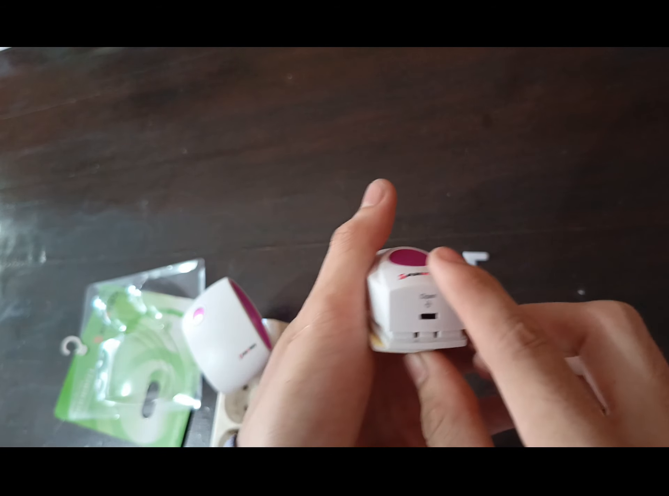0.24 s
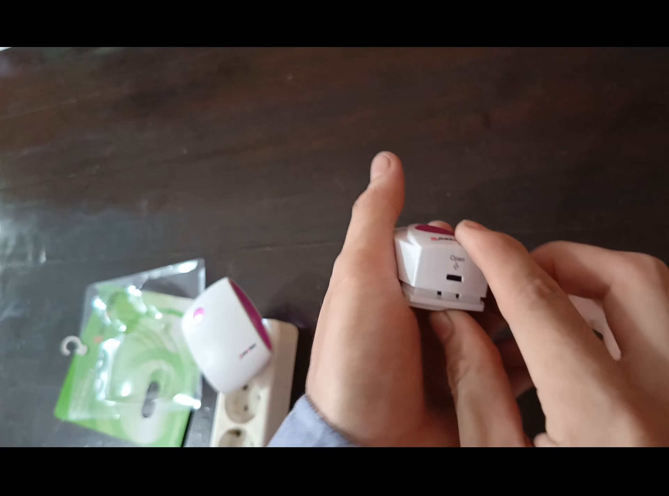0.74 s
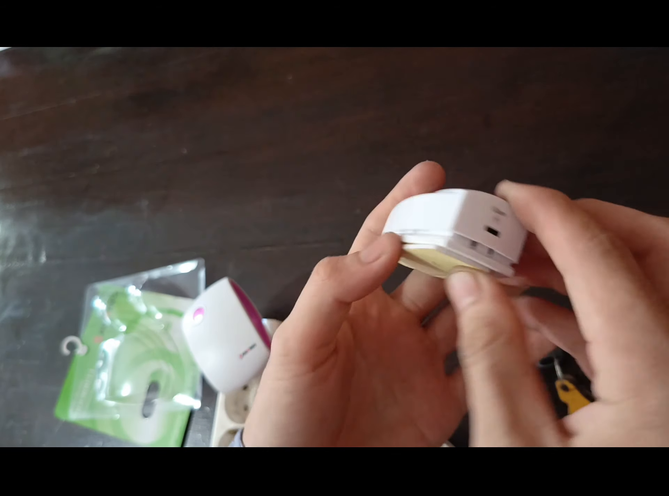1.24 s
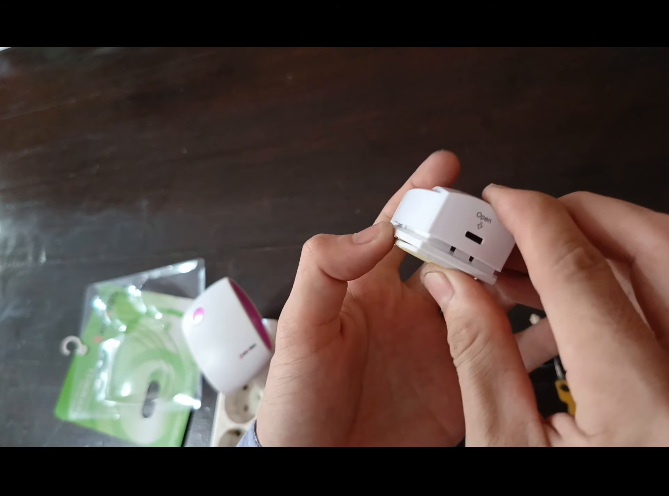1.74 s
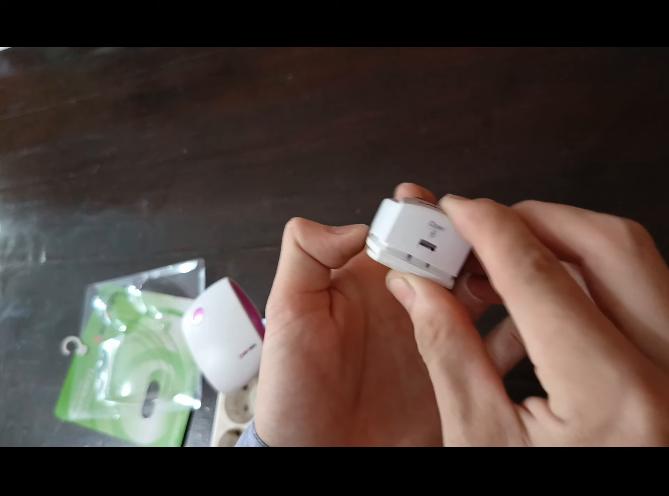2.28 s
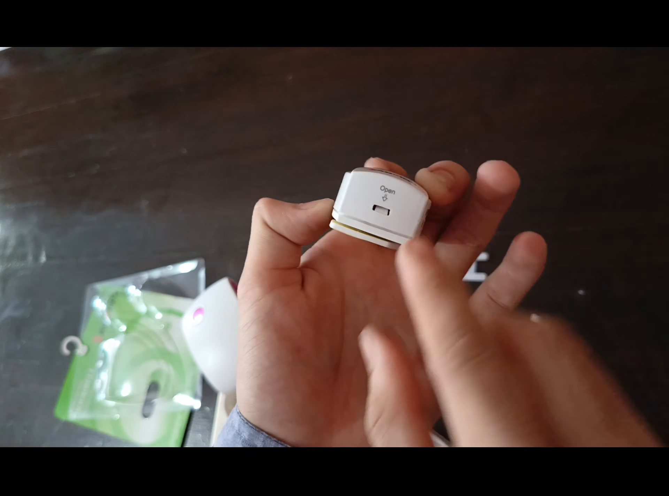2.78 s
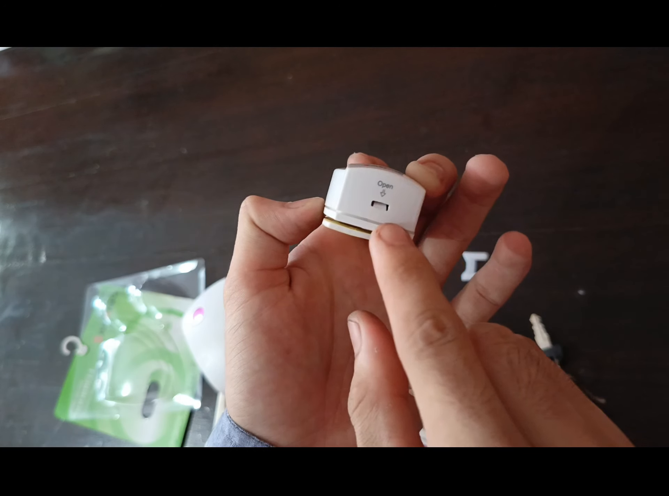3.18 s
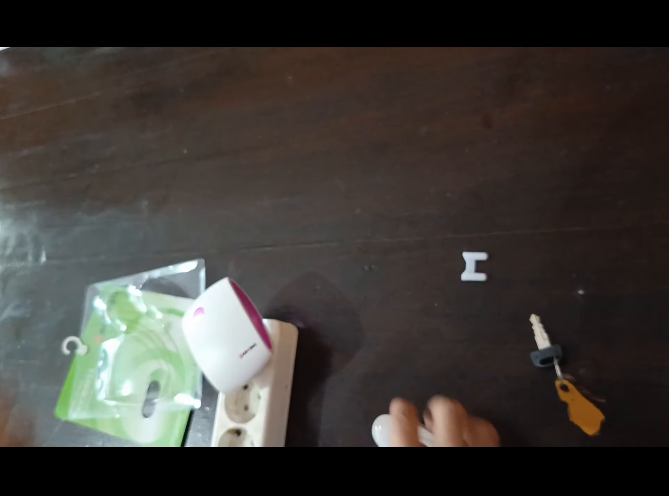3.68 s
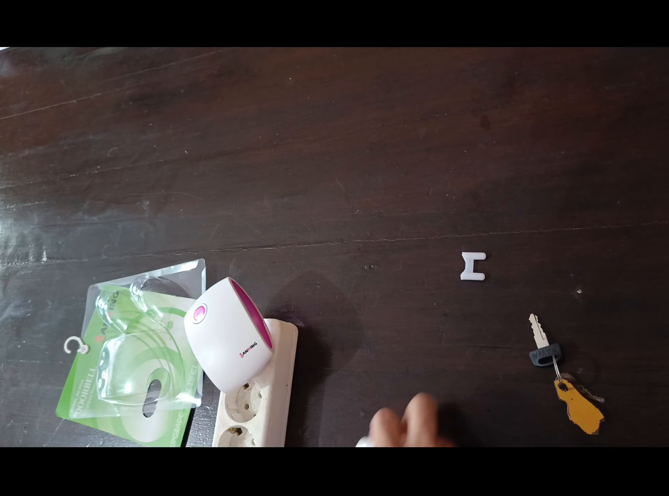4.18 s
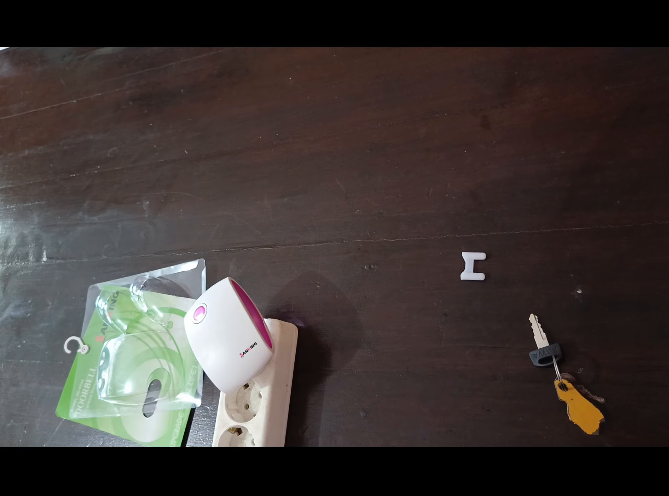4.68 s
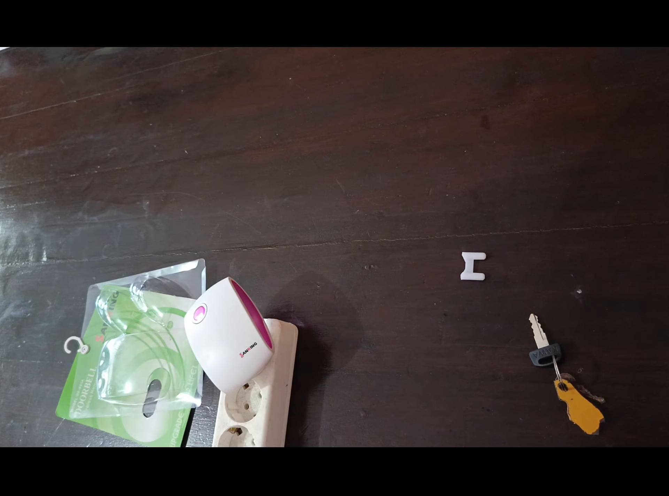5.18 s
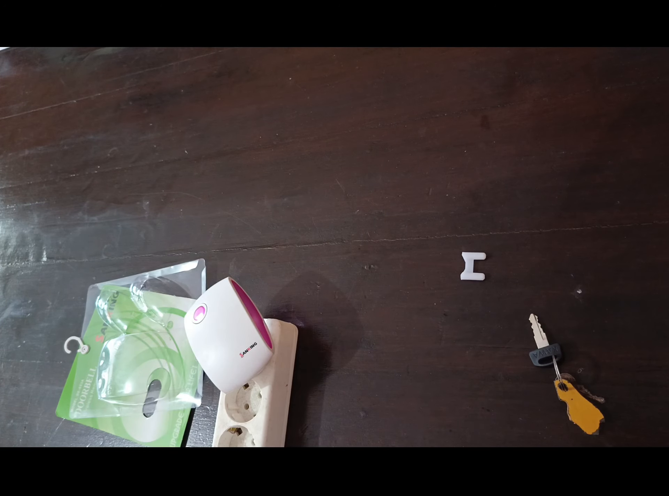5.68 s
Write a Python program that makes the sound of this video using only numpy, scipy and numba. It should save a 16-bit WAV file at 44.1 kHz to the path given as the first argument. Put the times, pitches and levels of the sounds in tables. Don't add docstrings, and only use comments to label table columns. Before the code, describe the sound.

A phone close to the hands in a bare, lightly echoing room. A faint low motor hum winds down and stops by about 0.8 s, over soft street rumble and far bird whistles. From 0.4 s, fingers knock a small hollow plastic shell: dull, boxy clacks around 1 kHz with thin wall ring, a firm one at 0.8 s. A tiny stick-slip creak at 1.35 s leads into a hard knock at 1.4 s; another at 1.7 s bounces quickly. Small ticks gather from 2.3 s, then at 2.43 s a latch snaps shut, bright, sharp and by far loudest, with a short room tail. Quiet skin rubs and touches follow to 3.5 s. Light wooden taps come around 4 s, with dry sleeve rustle, then a brief scrape and taps at 5.1-5.2 s. Bird notes cluster after 5.2 s as a distant vehicle approaches.

```python
import sys
import numpy as np
from scipy import signal
from scipy.fft import rfft, irfft, next_fast_len
from scipy.io import wavfile
from scipy.ndimage import uniform_filter1d, minimum_filter1d
from numba import njit

SR = 44100
rng = np.random.default_rng(int(sys.argv[2]) if len(sys.argv) > 2 else 0)


def waveform_to_disk(signal):
    frames = np.transpose(np.atleast_2d(signal))
    scaled = np.clip(frames, -1, 1) * 32767
    samples = np.round(scaled).astype(np.int16)
    wavfile.write(sys.argv[1], SR, samples)


def gain_from_decibels(decibels):
    exponent = np.asarray(decibels, float) / 20
    return 10 ** exponent


N = 261513
T = np.arange(N) / SR

# (frequency [Hz], density [dB per Hz])
STREET_SPECTRUM = [(25, -28), (50, -12.5), (75, -4.5), (130, -2), (200, -2), (400, -6.5), (1000, -11),
                   (2000, -15.5), (4000, -20.5), (5000, -23.5), (6300, -32), (8000, -46)]
# (rumble [dB], traffic [dB], hiss [dB], deep [dB])
CALM_DB = [-66.5, -71.5, -72, -80]
# (closest [s], half-power time [s], rumble [dB], traffic [dB], hiss [dB], deep [dB])
LEAVING = (0.08, 0.63, -69, -63.5, -69, -70)
LORRY = (4.95, .55, -74, -72, -80, -69)
COMING = (6.5, .35, -75, -58.5, -68.5, -80)
# (start [s], length [s], pitch [Hz], glide [share of pitch], level [dB])
BIRDS = [(0.052, 0.24, 2484, .01, -66), (0.108, 0.42, 2120, -.015, -63.5), (0.261, 0.056, 4120, .05, -72.5),
         (1.6, 0.063, 4050, .1, -75), (1.732, 0.045, 6280, 0.0054, -85), (2.181, 0.07, 3970, -.01, -72),
         (2.269, 0.064, 1880, -.06, -64), (3.05, 0.033, 752, 0.011, -63), (3.079, 0.045, 4580, -.01, -79),
         (3.765, 0.077, 4090, .03, -75.5), (4.157, 0.078, 3250, .03, -68.5),
         (4.465, 0.057, 3390, 0.14, -66.5), (4.911, 0.056, 1890, -0.045, -62.5),
         (5.22, .12, 2856, -.015, -68), (5.299, 0.15, 3870, .12, -75), (5.352, 0.037, 1828, .02, -61),
         (5.416, 0.04, 2000, 0.071, -58), (5.519, .04, 1865, -0.014, -71), (5.552, 0.027, 2280, .03, -73),
         (5.59, 0.058, 1790, -0.095, -58.5), (5.619, .04, 3050, 0.17, -63),
         (5.717, 0.048, 2190, 0.049, -56.5)]
# (start [s], length [s], low edge [Hz], high edge [Hz], level [dB])
RUBS = [(0.271, .05, 7000, 15800, -75), (.85, .09, 3600, 5000, -65), (0.926, 0.042, 1200, 5850, -65),
        (1.39, 0.022, 1500, 5000, -65), (2.192, 0.044, 150, 457, -61.5), (2.762, 0.014, 11050, 15800, -71),
        (2.826, .11, 1803, 5990, -67.5), (2.929, 0.043, 1500, 1877, -67), (2.861, .21, 559.6, 700, -62.5),
        (3.344, 0.078, 3700, 5500, -71.5), (3.495, 0.014, 500, 7000, -65.5),
        (3.551, 0.053, 2200, 5000, -64.5), (3.591, 0.031, 150, 1000, -61.5),
        (3.75, 0.11, 2500, 8000, -75.5), (4.168, 0.07, 200, 1200, -63.5), (4.313, 0.062, 199.4, 1000, -63),
        (4.5, 0.17, 3800, 5200, -72), (5.33, 0.12, 4200, 5000, -79)]
# (frequency [Hz], level [dB])
SKIN = [(150, 0), (4500, -3), (6000, -10.5), (8000, -24), (11500, -16), (13500, -21.5), (15200, -13)]
# (time [s], peak [dB], cavity [Hz], wall ring relative level [dB], wall ring [Hz])
KNOCKS = [(0.445, -40.5, 1180, -13.5, 3460), (0.612, -44, 1100, -21, 3400), (0.642, -62, 976, -22, 3360),
          (0.73, -45, 1060, -29, 2870), (0.828, -17.5, 990, -25, 4300), (0.918, -35.5, 930, -23, 3560),
          (0.991, -44, 960, -13.5, 4240), (1.065, -54, 970, -9.5, 3290), (1.104, -50, 1000, -3.5, 4246),
          (1.4075, -9.5, 1200, -17.5, 4500), (1.533, -49, 1200, -33, 2830), (1.591, -33.5, 1154, -31, 3160),
          (1.683, -13.5, 1053, -21, 3400), (1.813, -45.5, 1016, -18, 3410), (1.878, -50.5, 940, -31, 2880),
          (1.988, -50, 985, -12.5, 3420), (2.273, -48, 980, -17, 2835), (2.318, -49, 960, -18, 3484),
          (2.327, -49.5, 895, -28.5, 3452), (2.349, -49, 940, -21, 3193), (2.367, -48.5, 984, -23, 2985),
          (2.4086, -34.5, 984, -23, 2795), (2.774, -50, 955, -4, 4250)]
# (time [s], peak [dB], cavity [Hz])
TOUCHES = [
    (0.8378, -36.5, 1080),
    (1.4048, -30, 1000),
    (1.6808, -38, 1010),
    (1.6881, -20, 1097),
    (1.692, -33, 1100),
]
# (start [s], end [s], slip rate [1/s], cavity [Hz], level [dB])
CREAKS = [
    (1.335, 1.401, 165, 988, -46.5),
]
# (frequency [Hz], level [dB], t60 [s])
LATCH_MODES = [(900, -23.5, .01), (1310, -16, .01), (1600, -10.5, 0.018), (2300, -9, 0.0069),
               (2710, -6, .013), (3500, -12, .007), (4060, -0.5, 0.0074), (4500, -3.5, 0.0057),
               (4900, -5.5, 0.0085), (6900, -24, 0.006), (7500, -32, 0.0045), (11490, -32, 0.0047),
               (15200, -36, 0.00551)]
# (frequency [Hz], level [dB])
SNAP_TO_WALLS = [(88, -48.5), (150, -19), (466, -13.5), (637, -19), (854, -5.5), (941, -14), (1420, -3),
                 (2060, -8), (4760, -6), (7040, -19), (8070, -36.5), (11700, -30), (16000, -36.5)]
# (time [s], peak [dB], tick [Hz], tick relative level [dB])
TAPS = [(2.731, -59, 2200, 8.5), (3.49, -51, 1480, 0.6), (3.954, -45.5, 1370, 4.5), (3.966, -53, 1320, 6),
        (3.974, -59, 3044, 8), (4.044, -39, 2170, -8.5), (4.057, -47, 1596, -4), (4.194, -55, 3330, -5),
        (4.325, -53.5, 1318, -12), (4.408, -52.5, 2200, -5), (5.134, -44.5, 1470, -14.5),
        (5.141, -45.5, 1610, -5), (5.166, -47.5, 2616, -6), (5.184, -51.5, 1553, 4)]
# (frequency [Hz], level [dB])
SLIDE_COLOUR = [(180, -48), (300, -23), (645, 5.5), (842, -16), (1170, -5), (3130, -11.5), (4750, -19),
                (7820, -38), (16000, -50)]
# (peak time [s], peak [dB], length [s])
SLEEVE = [(2.859, -76.5, 0.074), (3.5, -90, .03), (3.568, -86, .06), (3.71, -86, 0.043),
          (3.791, -80.5, 0.11), (3.975, -80, 0.048), (4.414, -77, 0.029), (4.62, -80, .05),
          (4.77, -88, 0.082), (4.998, -90.5, .08), (5.17, -85, .07)]
# (frequency [Hz], t60 [s], level [dB])
ROOM = [(150, 0.7, -12), (500, 0.4, -7.5), (1200, 0.35, -12.5), (2500, 0.44, -7), (4500, .5, -16),
        (7000, 0.34, -11), (12020, .3, -6)]
# (frequency [Hz], level [dB])
MIC_HISS = [(8200, -13.5), (9000, -0.5), (10600, 3.5), (11300, -9), (12000, -20), (13800, -21.5),
            (15200, -7.5), (15800, -11.5), (16200, -30)]

HUM_HZ, HUM_DB, HUM_SAG_DB_PER_S = 136.3, -56, -7.5
HUM_STOP_S, HUM_STOP_EASE_S, DRONE_DB = 0.82, .04, -69.5
SNAP_S, SNAP_DB, SNAP_TO_WALLS_DB = 2.4289, 7.5, 20.5
SLIDE_S, SLIDE_DB, SLIDE_SAG_DB = 5.128, -49.5, -5.5
SLIDE_ATTACK_S, SLIDE_HOLD_S, SLIDE_RELEASE_S = 0.0067, 0.061, 0.044
REACH_S, REACH_END_S, REACH_EASE_S = 3.5, 5.05, .08
REACH_DB, STILL_DB, REACH_HISS_DB = -93, -103, -76


def noise(n=N):
    return rng.standard_normal(n)


def colour(x, points, lo_hz=1., hi_hz=21940.0):
    n = next_fast_len(len(x))
    f = np.maximum(np.fft.rfftfreq(n, 1 / SR), 1)
    hz, db = np.transpose(points)
    edge_power = 1 / (1 + (lo_hz / f) ** 6) / (1 + (f / hi_hz) ** 6)
    gain = gain_from_decibels(np.interp(np.log(f), np.log(hz), db)) * np.sqrt(edge_power)
    y = irfft(rfft(x, n) * gain, n)[:len(x)]
    return y / y.std()


def walk(rate):
    hold = int(SR / rate)
    steps = np.repeat(noise(N // hold + 1), hold)
    w = uniform_filter1d(uniform_filter1d(steps, hold), hold)[:N]
    return w / w.std()


def swell(start_s, attack_s, hold_s, release_s):
    return np.interp(T, start_s + np.cumsum([0, attack_s, hold_s, release_s]), [0, 1, 1, 0])


def decay(t, t60):
    return np.exp(-np.log(1000) * t / t60)


def ring(hz, t60, rise_s):
    t = np.arange(int(.12 * SR)) / SR
    y = (1 - np.exp(-t / rise_s)) ** 2 * decay(t, t60) * np.sin(2 * np.pi * hz * t)
    return y / np.abs(y).max()


def crack(t60, lo_hz, hi_hz):
    t = np.arange(int(.12 * SR)) / SR
    band = signal.butter(2, [lo_hz, hi_hz], "bandpass", fs=SR, output="sos")
    y = signal.sosfilt(band, noise(len(t)) * (1 - np.exp(-t / .0008)) * decay(t, t60))
    return y / np.abs(y).max()


def add(out, s, x):
    i = int(s * SR)
    out[i:i + len(x)] += x[:N - i]


def passing(closest_s, width_s):
    return 1 / (1 + ((T - closest_s) / width_s) ** 2)


def traffic():
    power = gain_from_decibels(np.array(CALM_DB))[:, None] ** 2
    for closest_s, width_s, *db in (LEAVING, LORRY, COMING):
        power = power + gain_from_decibels(np.array(db))[:, None] ** 2 * passing(closest_s, width_s)
    return np.sqrt(power)


def patchy(lo_hz, hi_hz, flicker_db, rate, count):
    n = next_fast_len(N)
    f = np.fft.rfftfreq(n, 1 / SR)
    whole = rfft(colour(noise(), STREET_SPECTRUM, lo_hz, hi_hz), n)
    place = np.interp(np.log(f + 1), np.log([lo_hz, hi_hz]), [0, count - 1])
    out = np.zeros(N)
    for k in range(count):
        band = irfft(whole * np.clip(1 - np.abs(place - k), 0, 1))[:N]
        out += gain_from_decibels(flicker_db * walk(rate)) * band
    return out


def motor():
    running = 1 / (1 + np.exp((T - HUM_STOP_S) / HUM_STOP_EASE_S))
    phase = 2 * np.pi * np.cumsum(HUM_HZ + 3 * walk(15)) / SR
    hum = gain_from_decibels(HUM_DB + HUM_SAG_DB_PER_S * T + 1.9 * walk(18)) * np.sin(phase)
    drone = gain_from_decibels(DRONE_DB + 1.5 * walk(7.9)) * colour(noise(), STREET_SPECTRUM, 118, 156)
    return running * hum + (1 - running) * drone


def street():
    rumble, tyres, hiss, deep = traffic()
    out = rumble * patchy(40, 370, 2.7, 12, count=3)
    out += tyres * patchy(400, 1800, 2.2, 15, count=3)
    out += hiss * patchy(1700, 8000, 2.2, 15, count=5)
    out += deep * gain_from_decibels(2.5 * walk(6.0)) * colour(noise(), STREET_SPECTRUM, 55, 90.5)
    return out


def birds():
    out = np.zeros(N)
    waver = walk(60)
    smear = walk(520) + 1j * walk(520)
    for s, length_s, pitch_hz, glide, db in BIRDS:
        i, n = int(s * SR), int(length_s * SR)
        u = np.linspace(0, 1, n)
        arch = .015 * (np.sin(np.pi * u) - .5)
        hz = pitch_hz * (1 + glide * (u - .5) + arch + .012 * waver[i:i + n])
        scatter = .55 + .7 * (hz / 3000) ** 1.2 * smear[i:i + n]
        shape = np.sqrt(np.sin(np.pi * u).clip(0)) * gain_from_decibels(db) * scatter
        add(out, s, np.real(shape * np.exp(2j * np.pi * np.cumsum(hz) / SR)))
    return out


def rubs():
    out, grain = np.zeros(N), walk(200)
    for s, length_s, lo_hz, hi_hz, db in RUBS:
        i, n = int(s * SR), int(length_s * SR)
        swish = colour(noise(16384), SKIN, lo_hz, hi_hz)[:n]
        add(out, s, gain_from_decibels(db + 2.4 * grain[i:i + n]) * np.sqrt(np.hanning(n)) * swish)
    return out


def shell():
    out = np.zeros(N)
    for s, db, hz, wall_db, wall_hz in KNOCKS:
        body = ring(hz, 0.0115, .0012)
        body += 0.22 * ring(.82 * hz, 0.016, .001) + 0.2 * ring(1.17 * hz, 0.012, .001)
        body += gain_from_decibels(-21) * ring(.42 * hz, 0.016, 0.0011)
        body += gain_from_decibels(-21.5) * ring(1.45 * hz, 0.013, 0.00066)
        wall = .8 * ring(wall_hz, 0.013, .0007) + .8 * crack(0.022, 2400, 4100)
        wall += .15 * crack(0.0083, 5800, 7000) + 0.076 * crack(0.0083, 9000, 16000)
        blow = gain_from_decibels(db) * (body / np.abs(body).max() + gain_from_decibels(wall_db) * wall)
        for delay_s, share in ((-.0005, 1), (.0042, .1), (.016, .06)):
            add(out, s + delay_s, share * blow)
    return out


def spill():
    out = np.zeros(N)
    for s, db, hz, wall_db, _ in KNOCKS:
        sides = ring(1.12 * hz, .013, .0011) + .7 * ring(.8 * hz, .012, .0011)
        add(out, s, gain_from_decibels(db - 3) * (sides + gain_from_decibels(wall_db + 1.5) * crack(.012, 2300, 5200)))
    return out


def touches():
    out = np.zeros(N)
    for s, db, hz in TOUCHES:
        add(out, s, gain_from_decibels(db) * (ring(hz, 0.012, .001) + 0.13 * crack(0.01, 1900, 5000)))
    return out


def creak():
    out = np.zeros(N)
    for start_s, end_s, rate, hz, db in CREAKS:
        chance = rng.standard_normal((40, 3))
        gaps_s = (1 + 0.17 * chance[:, 0]).clip(.3) / rate
        times = start_s + np.cumsum(gaps_s) - 1 / rate
        for s, (_, size, pitch) in zip(times[times < end_s], chance):
            add(out, s, gain_from_decibels(db + 1.4 * size) * ring(hz * (1 + .04 * pitch), 0.014, 0.0011))
    return out


def snap():
    near, click = np.zeros(N), np.zeros(N)
    latch = 0
    for k, (hz, db, t60) in enumerate(LATCH_MODES):
        latch = latch + (-1) ** k * gain_from_decibels(db) * ring(hz, t60, .0009)
    latch = latch / np.abs(latch).max()
    latch += 0.18 * crack(0.023, 1000, 3200) + 0.015 * crack(0.021, 9500, 12000)
    thud = gain_from_decibels(-30.0) * ring(300, 0.01601, 0.00048)
    add(near, SNAP_S - .0025, .06 * crack(.03, 2000, 5000))
    add(near, SNAP_S, gain_from_decibels(SNAP_DB) * (latch + thud))
    add(near, SNAP_S + 0.0023, .25 * gain_from_decibels(SNAP_DB) * latch)
    click[int((SNAP_S + .004) * SR)] = 1
    return near, gain_from_decibels(SNAP_TO_WALLS_DB) * colour(click, SNAP_TO_WALLS) / np.sqrt(N)


def taps():
    out = np.zeros(N)
    for s, db, hz, tick_db in TAPS:
        thud = gain_from_decibels(-6.5 - max(tick_db, 0)) * ring(195.5, 0.062, 0.0014)
        board = crack(.04, 290, 1000) + thud
        tick = .5 * ring(hz, 0.04, 0.00049) + crack(0.018, 1520, 3650)
        add(out, s, gain_from_decibels(db) * (board + gain_from_decibels(tick_db) * tick))
    return out


def slide():
    strong = rng.random(N) < .03
    grains = noise() * gain_from_decibels(2 * rng.exponential(size=N) * strong)
    drag = swell(SLIDE_S, SLIDE_ATTACK_S, SLIDE_HOLD_S, SLIDE_RELEASE_S)
    slowing_db = SLIDE_SAG_DB * ((T - SLIDE_S) / SLIDE_HOLD_S).clip(0, 2)
    return colour(grains, SLIDE_COLOUR) * gain_from_decibels(SLIDE_DB + slowing_db) * drag


def sleeve():
    grains = noise() * gain_from_decibels(1.8 * walk(130))
    reach = swell(REACH_S, REACH_EASE_S, REACH_END_S - REACH_S, REACH_EASE_S)
    gain = gain_from_decibels(STILL_DB) + gain_from_decibels(REACH_DB) * reach
    for s, db, length_s in SLEEVE:
        gain = gain + gain_from_decibels(db) * swell(s - .3 * length_s, .3 * length_s, 0, .9 * length_s) ** 2
    weave = gain_from_decibels(REACH_HISS_DB + 2.23 * walk(8)) * reach * colour(grains, SKIN, 2500, 7500)
    dry_hz_db = [(5000, -11), (8000, -13), (12000, 1.5), (13500, -2), (15000, 3.5)]
    return weave + gain * colour(grains, dry_hz_db, 5000, 15800)


def room(x):
    t = np.arange(int(.8 * SR)) / SR
    tail = 0
    for hz, t60, db in ROOM:
        band = colour(noise(len(t)), [(1, 0), (2, 0)], hz / 1.76, hz * 1.345)
        lumps = gain_from_decibels(2.4 * walk(130)[:len(t)])
        tail = tail + gain_from_decibels(db) * np.sqrt(hz / SR / 4000) * lumps * band * decay(t, t60)
    build = 1 - np.exp(-np.maximum(t - .005, 0) / .004)
    early = 0.75 + .2 / (1 + np.exp((t - .072) / 0.0044))
    return signal.fftconvolve(x, tail * build * early)[:N]


def scene():
    far = birds()
    hands = rubs() + shell() + touches() + creak() + taps() + slide()
    latch, click = snap()
    palm = signal.butter(2, 1900, fs=SR, output="sos")
    shielded = .3 * hands + .65 * signal.sosfiltfilt(palm, hands)
    answer = gain_from_decibels(6.0) * room(.7 * shielded + spill() + click + 1.3 * far)
    return (hands + latch + answer + far + street() + motor() + sleeve())[None]


@njit
def follow(x, attack, release):
    y, e = np.empty(len(x)), 0.
    for i in range(len(x)):
        e += (abs(x[i]) - e) * (attack if abs(x[i]) > e else release)
        y[i] = e
    return y


def roll_off(x):
    return signal.sosfilt(signal.butter(12, 16840, fs=SR, output="sos"), x)


def record(dry):
    peaks = -minimum_filter1d(-np.abs(dry[0]), size=301)
    env = follow(uniform_filter1d(peaks, size=151), 0.89, 1 / (.055 * SR))
    limited = dry * np.minimum(1, 0.8 / env)
    bass_cut = signal.butter(2, 32, "highpass", fs=SR, output="sos")
    top_cut = signal.ellip(8, .2, 40, 15900, fs=SR, output="sos")
    hiss = gain_from_decibels(-84) * colour(noise(), MIC_HISS, 8000, 15720)
    mix = signal.sosfilt(np.vstack([bass_cut, top_cut]), limited) + hiss
    return roll_off(mix)


dry = scene()
out = record(dry)
waveform_to_disk(out)
```